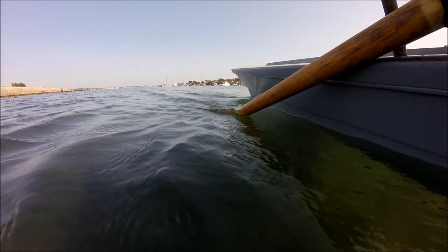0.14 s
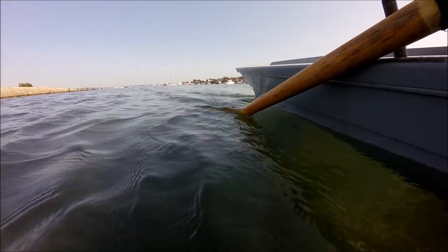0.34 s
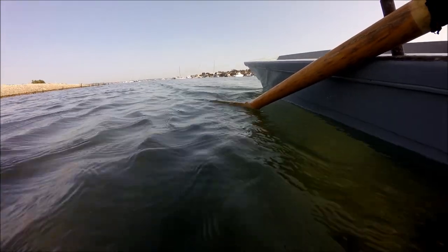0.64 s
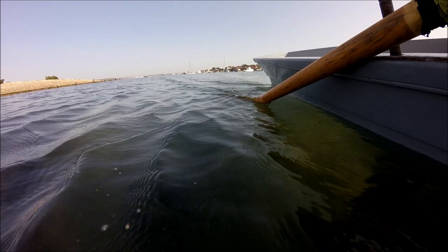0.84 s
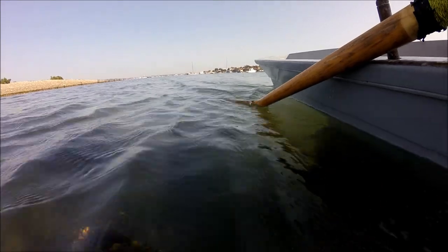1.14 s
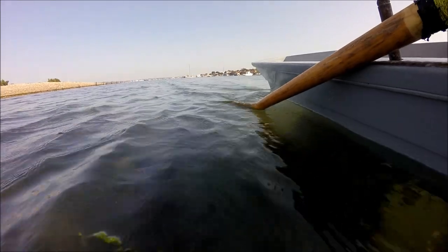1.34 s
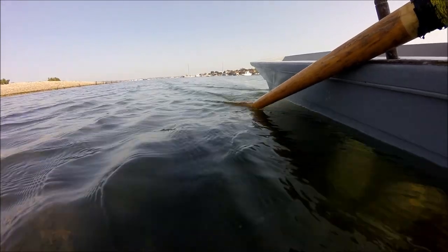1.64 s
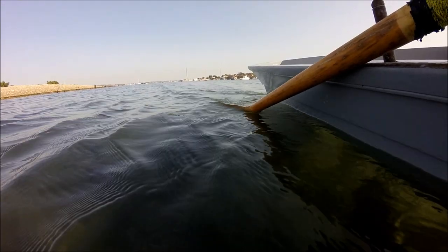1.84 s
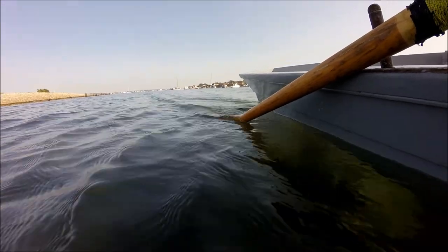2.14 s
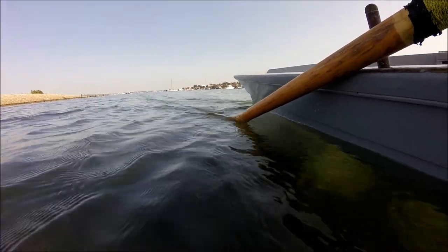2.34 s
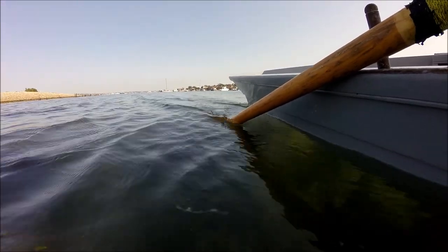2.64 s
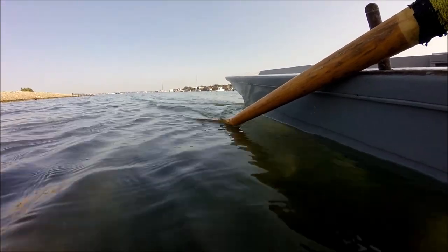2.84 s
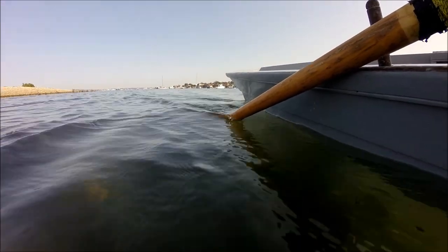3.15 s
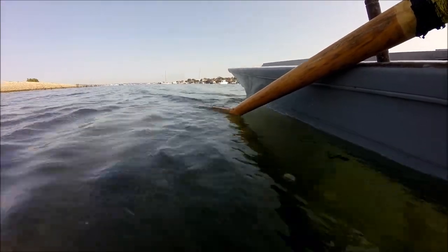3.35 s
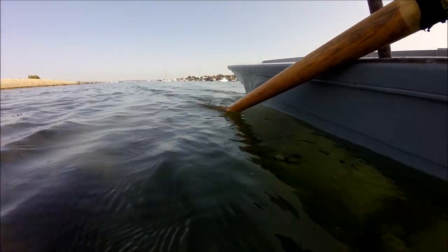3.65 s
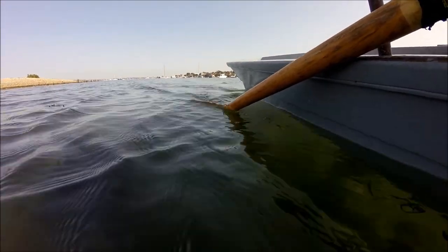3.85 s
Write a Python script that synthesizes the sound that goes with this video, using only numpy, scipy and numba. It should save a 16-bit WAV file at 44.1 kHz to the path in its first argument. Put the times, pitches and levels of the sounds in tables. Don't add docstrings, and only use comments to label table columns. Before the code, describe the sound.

Small waves slap and gulp against a boat hull in uneven bursts, with bubbles plinking and spray ticking, over steady soft hiss and dull wind thumps; close, slightly muffled mono microphone low on open water.

```python
import sys
import numpy as np
from scipy import signal
from scipy.fft import rfft, irfft
from scipy.io import wavfile
from scipy.ndimage import uniform_filter1d
from numba import njit

SR = 44100
rng = np.random.default_rng(int(sys.argv[2]) if len(sys.argv) > 2 else 0)


def level_to_linear(level):
    exponent = np.asarray(level, float) / 20
    return 10 ** exponent


def put_to_file(sound):
    columns = np.atleast_2d(sound).T
    safe = np.clip(columns, -1, 1)
    whole_steps = np.round(safe * 32767)
    wavfile.write(sys.argv[1], SR, whole_steps.astype(np.int16))


N = 176400


def level(x, db):
    return x * level_to_linear(db) / np.sqrt(np.mean(x ** 2))


def shape(table, hz):
    table = np.array(table)
    return np.interp(np.log(hz), np.log(table[:, 0]), table[:, 1])


def band(x, hz, width):
    return signal.lfilter(*signal.iirpeak(hz, hz / width, fs=SR), x)


def walk(rate):
    hold = int(SR / rate)
    steps = np.repeat(rng.standard_normal(N // hold + 1), hold)
    return 1.17 * uniform_filter1d(uniform_filter1d(steps, hold), hold)[:N]


@njit
def ring(n, start, hz, size, cycles, glide, rise, sr):
    out = np.zeros(n)
    for k in range(len(start)):
        tau = cycles[k] / hz[k] * sr
        first = int(start[k] * sr)
        phase = 0.
        for j in range(int(7 * tau)):
            phase += 2 * np.pi * hz[k] / sr * (1 + glide[k] * j / tau)
            if 0 <= first + j < n:
                swell = 1 - np.exp(-j / (rise * tau))
                out[first + j] += size[k] * np.sin(phase) * np.exp(-j / tau) * swell
    return out


def grains(start, hz, db, cycles, glide, rise):
    one = np.ones(len(start))
    return ring(N, start * one, hz * one, level_to_linear(db) * one, cycles * one, glide * one, 1. * rise, 1. * SR)


def bubbles(table, trim_db, cycles, glide):
    start, db, hz = np.array(table).T
    lag, detune = rng.random((len(start), 2)).T
    twin_start = start + 2 * lag * cycles / hz
    twin_hz = hz * (0.88 + 0.25 * detune)
    twin = grains(twin_start, twin_hz, db + trim_db + 5, 0.7 * cycles, glide, rise=0.12)
    return grains(start, hz, db + trim_db + 3, cycles, glide, rise=0.16) + twin


# frequency in Hz, level in dB per Hz.
WASH_SPECTRUM = [(30, -2), (71, -7.5), (306, -5.5), (1500, -19), (3500, -24), (5600, -26), (11000, -27.5),
                 (15300, -31.5)]


def wash():
    hz = np.maximum(np.arange(N // 2 + 1) * SR / N, 10)
    spectrum = rfft(rng.standard_normal(N)) * level_to_linear(shape(WASH_SPECTRUM, hz))
    low = 1 / (1 + (hz / 2500) ** 4)
    swell_db = 0.5 * walk(3.14) + 1.2 * walk(24.66)
    water = irfft(spectrum * low, N) * level_to_linear(swell_db)
    hiss = irfft(spectrum * (1 - low), N)
    return level(water + hiss, -54)


def strays(count=700):
    when, pitch, size = rng.random((count, 3)).T
    hz = 500 * 14 ** pitch
    db = -55 - 5 * np.log2(hz / 1000) - 2.7 * np.log(size + 0.018)
    return grains(when * N / SR, hz, db, 5 * np.sqrt(hz / 2000), 0.006, rise=0.12)


def fizz(count=260):
    when, pitch, size, ringing = rng.random((count, 4)).T
    hz = 5140 * (1 + 0.5 * pitch ** 2)
    db = -61 - 3.5 * np.log(size + 0.02)
    return grains(when * N / SR, hz, db, 1 + 7 * ringing, 0, rise=0.2)


# start in seconds, length in seconds, level in dB.
GUSTS = [(-.05, 0.27, -46), (0.3, 0.13, -42), (.43, 0.34, -35.5), (0.789, 0.13, -43), (1.04, 0.21, -40.5),
         (1.239, 0.42, -47), (1.836, 0.38, -46.5), (2.525, 0.16, -49.5), (2.762, 0.277, -39),
         (3.185, 0.21, -45.5), (3.77, 0.15, -47.5), (3.958, 0.033, -47)]
# crest in seconds, level in dB, pitch in Hz.
THUMPS = [(0.3264, -26, 132), (0.35, -25, 126), (.447, -24.5, 131), (.462, -26.5, 130), (0.485, -41, 149),
          (0.5045, -32, 74), (0.5268, -27, 90), (0.545, -26, 118), (0.568, -36, 135), (0.6117, -25, 115),
          (0.673, -24.5, 93), (0.7077, -20, 165), (0.739, -17.5, 180), (0.812, -29, 190),
          (1.062, -29.5, 145), (1.1641, -20.5, 152), (1.195, -24, 63), (1.47, -27.5, 73), (1.92, -28, 69),
          (1.987, -28.5, 88.5), (2.5406, -28.5, 88), (2.7885, -16, 115), (2.8159, -18, 114),
          (2.854, -22, 121), (2.9103, -25.5, 94), (2.933, -38, 116), (2.9958, -19.5, 99.5),
          (3.2087, -28, 90)]
GUST_RISE_S, GUST_FALL_S, CALM_DB = 0.0064, 0.013, -54.5
BUFFET_HZ, RUMBLE_HZ = 111.6, 54.6


def wind():
    start, length, db = np.array(GUSTS).T[:, :, None]
    late = np.arange(N) / SR - start
    rise = np.clip(late / GUST_RISE_S, 0, 1)
    fall = np.exp(-np.clip(late - length, 0, None) / GUST_FALL_S)
    gust = np.sum(level_to_linear(db) * rise * fall, axis=0) + level_to_linear(CALM_DB)

    flutter = rng.standard_normal(N)
    for width in (95, 180, 340):
        flutter = band(flutter, BUFFET_HZ, width)
    rumble = rng.standard_normal(N)
    for width in (31, 64):
        rumble = band(rumble, RUMBLE_HZ, width)
    flutter = level(flutter, 0) * level_to_linear(1.43 * walk(30.24))
    rumble = level(rumble, -2.5) * level_to_linear(0.37 * walk(19))

    crest, db, hz = np.array(THUMPS).T
    thumps = grains(crest - 0.54 / hz, hz, db + 7.5, 0.67, -0.01, rise=0.95)
    return gust * level_to_linear(-4) * (flutter + rumble) + thumps


# crest in seconds, level in dB, pitch in Hz.
GULPS = [(.008, -38, 308), (.049, -37, 623), (.052, -34.5, 300), (0.079, -41.5, 254), (0.559, -29, 427),
         (.563, -30.5, 272), (.634, -33.5, 312), (.668, -35.5, 416), (.702, -38, 269), (.79, -43, 452),
         (.898, -47.5, 227), (1.09, -40.5, 374), (1.133, -27, 296), (1.141, -27.5, 607), (1.183, -39, 298),
         (1.498, -40, 475), (1.516, -36.5, 493), (1.54, -33.5, 295), (1.557, -38, 206), (1.979, -38.5, 501),
         (1.98, -38.5, 324), (2.017, -40.5, 427), (2.021, -41.5, 284), (2.182, -35.5, 462),
         (2.217, -42.5, 400), (2.282, -40.5, 325), (2.3, -44.5, 330), (2.323, -43, 342),
         (2.443, -51.5, 313), (2.61, -40, 494), (2.69, -41, 552), (2.789, -34.5, 222), (2.888, -38.5, 423),
         (3.293, -26.5, 382), (3.31, -33, 365), (3.337, -29, 357), (3.37, -33, 426), (3.375, -36, 242),
         (3.38, -35.5, 636), (3.78, -34.5, 417), (3.799, -29.5, 314), (3.833, -38, 482), (3.86, -37.5, 252)]
GULP_CYCLES = 3.234


def gulps():
    crest, db, hz = np.array(GULPS).T
    start = crest - 0.89 * GULP_CYCLES / hz
    return grains(start, hz, db + 11, GULP_CYCLES, -0.0075, rise=0.77)


# start in seconds, level in dB, length in seconds, treble share in dB.
SLAPS = [(.018, -30, 0.056, -12.5), (.536, -28, 0.033, -15), (.618, -34.5, 0.03, -14.5),
         (.65, -30.5, 0.045, -11), (.696, -31, 0.027, -8), (1.044, -36.5, 0.083, -14.5),
         (1.116, -31, 0.026, -14), (1.13, -25, .034, -35), (1.265, -40, 0.025, -11.5),
         (1.489, -32, 0.049, -14.5), (1.54, -36, .09, -16.5), (1.959, -38.5, 0.045, -24),
         (2.045, -40, 0.052, -27), (1.992, -34.5, 0.034, -16), (2.674, -47, .025, -26),
         (2.794, -34, .017, -13.5), (2.85, -31, 0.046, -15.5), (3.278, -27.5, .021, -15.5),
         (3.303, -25.5, 0.043, -25), (3.362, -34, .05, -21), (3.758, -33, 0.073, -20),
         (3.805, -36.5, 0.036, -8.5), (3.845, -39, 0.057, -31)]
# start in seconds, level in dB, length in seconds.
LAPS = [
    (0.165, -44, .04),
    (0.787, -46, .05),
    (2.168, -33.5, .03),
    (2.268, -38.5, .034),
    (2.43, -44, .025),
    (2.6, -36, .04),
]
# frequency in Hz, level in dB.
POCKETS = [(220, -7.5), (320, -2), (900, 1.5), (1500, 1), (2700, 3.5), (4000, -1.5), (5600, 1),
           (7500, -15.5)]
# frequency in Hz, level in dB, 60 dB decay time in seconds.
HULL = [(325, 5, 0.11), (418, -1.5, 0.17), (500, -11, 0.02), (646, -5, 0.017), (955, -3.5, 0.054)]
LAP_TREBLE_DB, TREBLE_FROM_HZ = -23.5, 990
LEAD_S, SLAP_TAIL = 0.008, 0.6


def slaps(count=150):
    rows = SLAPS + [(s, db, length, LAP_TREBLE_DB) for s, db, length in LAPS]
    start, db, length, treble_db = np.array(rows).T[:, :, None]
    u = rng.random((len(rows), count, 4))
    hz = 230 * 33 ** ((np.arange(count) + u[..., 0]) / count)
    low = 900 / (900 + hz)
    log_wait = np.log(u[..., 2] + 1e-9)
    delay = length * (u[..., 1] * 0.45 - log_wait * (0.25 + SLAP_TAIL * low))
    pocket_start = start - LEAD_S * (1 - low) + delay
    size_db = db - 6 + shape(POCKETS, hz) + treble_db / (1 + (TREBLE_FROM_HZ / hz) ** 3)
    size_db = size_db - 2.19 * np.log(u[..., 3] + 1e-9) + 2.5 * log_wait
    hz = hz.ravel()
    cycles = 1.2 * (hz / 300) ** 0.6
    froth = grains(pocket_start.ravel(), hz, size_db.ravel(), cycles, 0.031, rise=0.47)

    late = np.clip(np.arange(N) / SR - start, 0, None) / (length * 0.18)
    push = np.sum(level_to_linear(db) * late * np.exp(1 - late), axis=0)
    push = push * rng.standard_normal(N) * level_to_linear(1.8 * walk(60))
    push = signal.sosfilt(signal.butter(2, 1420, fs=SR, output="sos"), push)
    hull = np.zeros(N)
    for mode_hz, mode_db, t60 in HULL:
        width = np.log(1000) / np.pi / t60
        hull += level_to_linear(mode_db) * band(push, mode_hz, width) * np.sqrt(t60 * SR)
    return froth + level_to_linear(-25.5) * hull


# start in seconds, level in dB, pitch in Hz.
DROPS = [(0.0199, -43, 4200), (0.0822, -52, 5550), (0.166, -44.5, 5700), (0.2169, -45.5, 5700),
         (0.4294, -47, 5580), (0.4594, -54, 4380), (0.524, -38, 6100), (0.609, -51, 5560),
         (0.6389, -56, 5760), (0.6993, -54, 5500), (0.7267, -46.5, 4090), (0.7562, -48, 5500),
         (0.8415, -50, 5520), (1.1164, -62, 5780), (1.2336, -53, 5200), (1.294, -45, 5120),
         (1.501, -46, 5600), (1.5823, -44.5, 6120), (1.6926, -40, 5740), (1.7898, -45, 5700),
         (1.8307, -49.5, 5220), (1.986, -39.5, 5540), (2.0908, -40.5, 5300), (2.1725, -58, 6620),
         (2.4309, -49, 5950), (2.4646, -45, 3850), (2.5088, -38.5, 5700), (2.5641, -53, 5880),
         (2.7948, -39, 6360), (2.845, -43.5, 5360), (2.8787, -47, 8090), (2.9784, -44.5, 4360),
         (3.2055, -46, 7050), (3.267, -51, 4430), (3.3064, -43.5, 5600), (3.3484, -44.5, 6300),
         (3.4647, -49, 5340), (3.504, -51, 7120), (3.7753, -50, 5800), (3.8307, -46, 5800)]


def drops():
    return bubbles(DROPS, -7, cycles=6.5, glide=0.0034)


# start in seconds, level in dB, pitch in Hz.
PLINKS = [(0.0238, -48, 1660), (0.0593, -42, 1730), (0.0977, -50, 1870), (0.5377, -41, 2670),
          (0.621, -41.5, 1800), (0.7003, -44, 1680), (1.1139, -48.5, 2870), (1.5, -45, 2420),
          (1.6871, -43, 1920), (1.8063, -51.5, 2224), (2.4997, -48, 1770), (2.8494, -43.5, 2370),
          (2.9781, -49.5, 2730), (3.2784, -40.5, 1730), (.4304, -51.5, 2190), (.5786, -47, 2260),
          (.6434, -50, 2750), (.9702, -51.5, 2250), (1.5474, -49, 1600), (1.9001, -51.5, 2280),
          (2.9337, -51, 3220), (3.397, -53, 2230), (3.5932, -53, 1640), (3.8082, -46, 2620)]


def plinks():
    return bubbles(PLINKS, 0.7, cycles=5.5, glide=0.0081)


# start in seconds, level in dB, pitch in Hz.
PLOPS = [(0.169, -45.5, 1120), (0.448, -49.5, 1105), (0.548, -34, 1190), (1.087, -37.5, 1170),
         (1.265, -53, 1105), (1.508, -37.5, 778), (1.601, -37.5, 1200), (1.706, -49, 815),
         (1.996, -41.5, 772), (2.172, -44, 1400), (2.359, -49, 1018), (2.796, -43, 886),
         (2.858, -38.5, 955), (3.049, -46.5, 1126), (3.742, -41.5, 1180), (3.893, -50.5, 960),
         (.028, -48, 1090), (.565, -39, 860), (.665, -39.5, 736), (.698, -41.5, 1100), (1.128, -39.5, 940),
         (1.628, -48.5, 810), (2.432, -45.5, 776), (3.286, -42.5, 892), (3.327, -43, 783),
         (3.816, -48, 987)]


def plops():
    return bubbles(PLOPS, 2.1, cycles=5.8, glide=0.0072)


def scene():
    water = wash() + strays() + gulps() + slaps() + plinks() + plops()
    water = water - 0.81 * band(water, 4790, 1570)
    heard = water + fizz() + wind() + drops()
    return signal.sosfilt(signal.butter(2, 31.3, "high", fs=SR, output="sos"), heard)[None]


def low_pass(x):
    return signal.sosfilt(signal.butter(12, 15540, fs=SR, output="sos"), x)


def record(dry):
    return low_pass(dry)


dry = scene()
out = record(dry)
put_to_file(out)
```